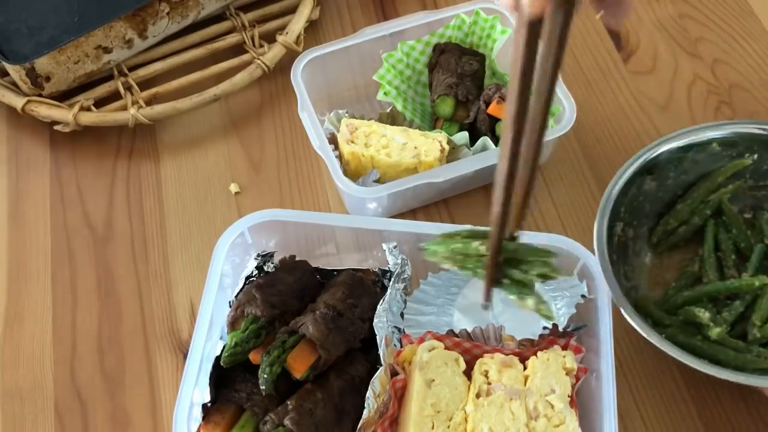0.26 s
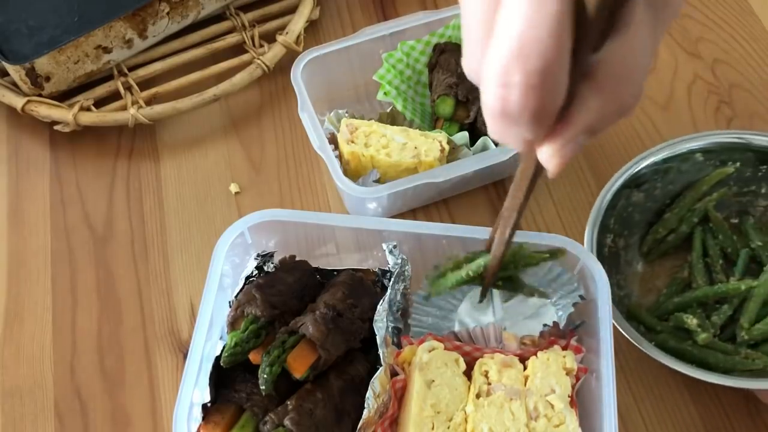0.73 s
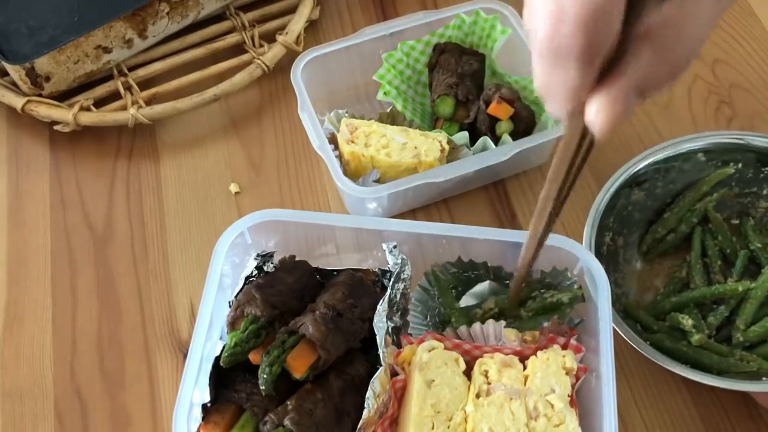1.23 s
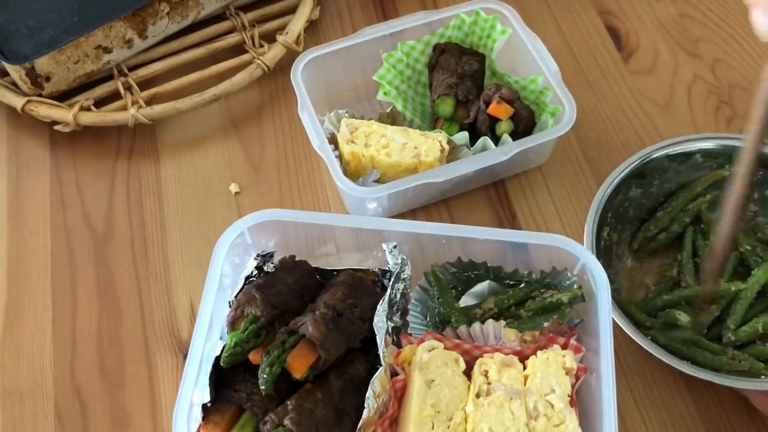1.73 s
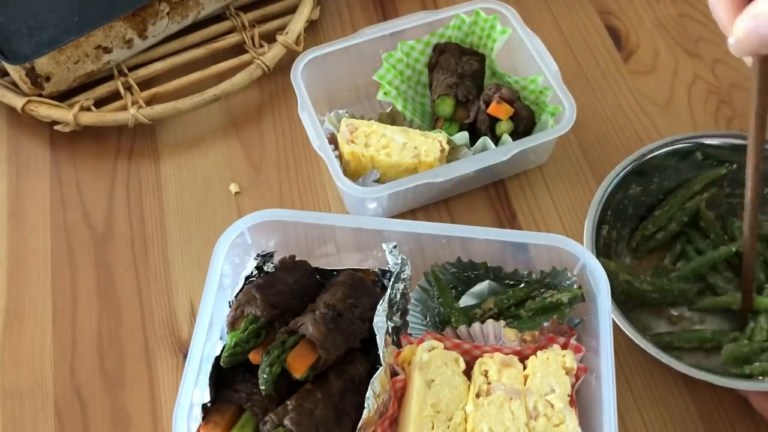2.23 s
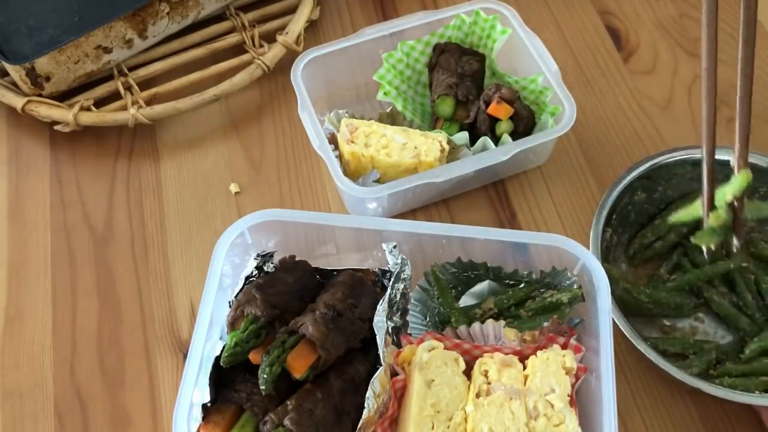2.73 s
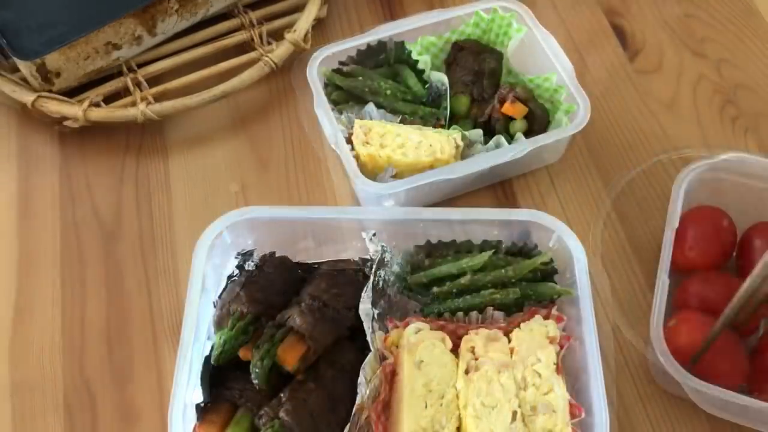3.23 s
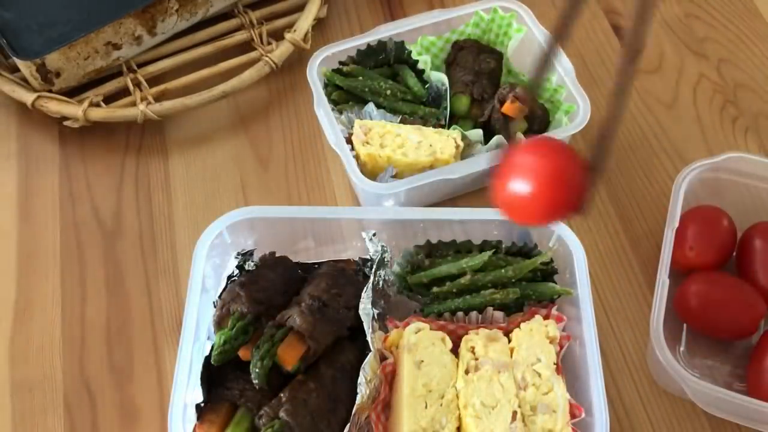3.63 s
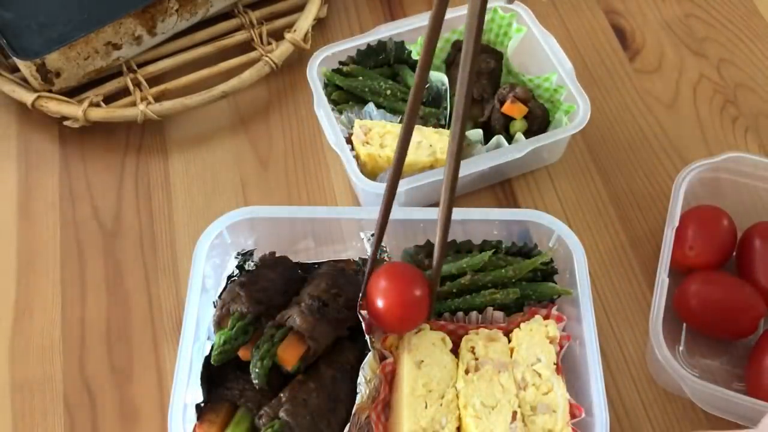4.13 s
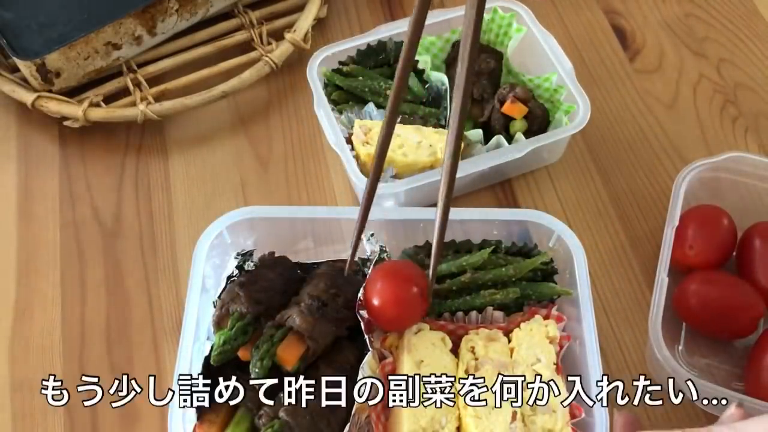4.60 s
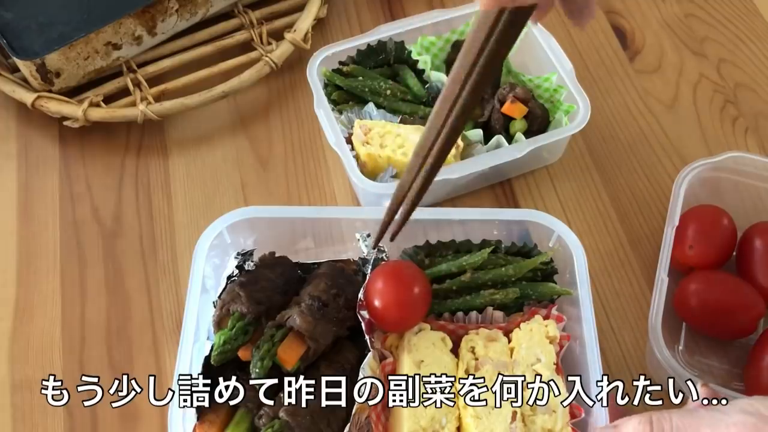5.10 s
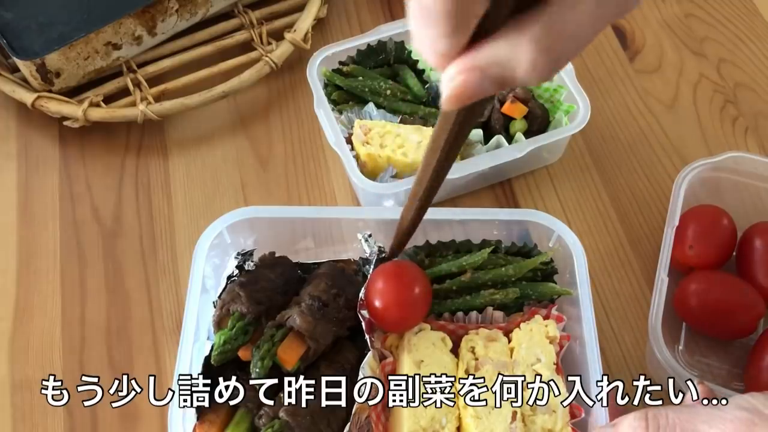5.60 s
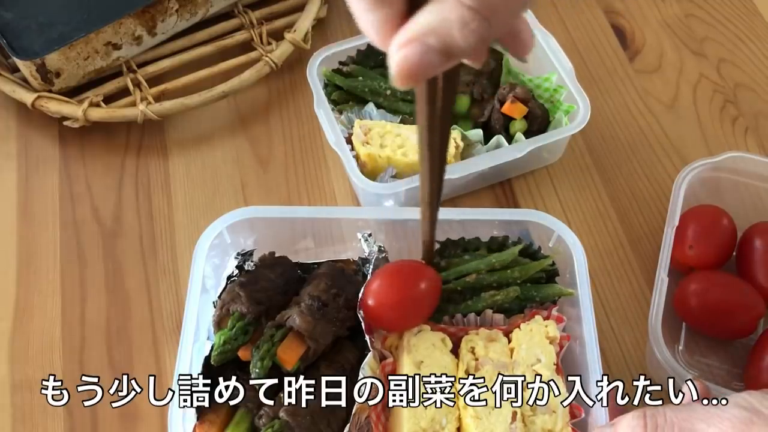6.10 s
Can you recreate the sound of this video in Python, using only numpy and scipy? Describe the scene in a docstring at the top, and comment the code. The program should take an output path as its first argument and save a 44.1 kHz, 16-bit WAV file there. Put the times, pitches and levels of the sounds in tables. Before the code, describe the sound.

Chopsticks pack food into plastic lunch boxes, with crinkling paper and foil and light taps on a bowl and box rim.

```python
"""A quiet kitchen: chopsticks pack food into plastic lunch boxes on a wooden table, a phone just above.
A pleated cup, a foil divider and a thin tub crackle as their creases snap, with fine rustle between.
Sticks tap bowl and box and drag along the box wall; blows that reach the table top thud.
A small room answers over air noise and appliance hum."""
import sys
import numpy as np
from scipy import signal
from scipy.fft import rfft, irfft
from scipy.io import wavfile
from scipy.ndimage import uniform_filter1d

SR = 44100
rng = np.random.default_rng(int(sys.argv[2]) if len(sys.argv) > 2 else 0)


def inscribe(sig):
    """Save sig as 16-bit PCM at rate SR to the path in sys.argv[1].

    A 1-D sig is mono; a 2-D sig holds one channel per row.
    Samples are clipped to [-1, 1] before scaling.
    """
    pcm = np.round(np.clip(np.atleast_2d(sig).T, -1, 1) * 32767)
    wavfile.write(sys.argv[1], SR, pcm.astype(np.int16))


N = 280035

# plastic box modes: pitch_hz, level_db, t60_s
BOX_MODES = [(396, -18, 0.042), (546, -12.5, 0.059), (710, -3.5, 0.012), (946, -24.5, 0.03),
             (1173, -2.5, 0.017), (1620, 1.5, 0.0061), (2280, 6, 0.0078), (2550, -0.5, 0.015),
             (3650, -5, 0.015), (4120, 5.5, 0.0077), (5030, 5, 0.0047), (5920, -1.5, 0.01)]


def pleated_cup():
    """The pleats snap in one loud cluster."""
    # snaps: peak_s, level_db, bright_db, t60_ms
    snaps = [(0.3731, -66, -0.5, 60), (0.3913, -67.5, -4, 66), (0.4651, -29, -16, 26), (0.4696, -38, 1, 40),
             (0.4978, -37, -7, 33), (0.5031, -29.5, 4.5, 17), (0.5158, -39.5, 7.5, 18),
             (0.5645, -43, -12, 16), (0.5715, -35.5, 2, 21), (0.5942, -18.5, 0, 24),
             (0.6312, -33.5, 5.5, 33), (0.648, -36.5, -2, 20), (0.6565, -37.5, 3, 52),
             (0.6669, -29.5, 1.5, 14), (0.6797, -33.5, -7.5, 24), (0.6915, -28, 0, 34),
             (0.7195, -30.5, -1, 30), (0.7332, -23, 8, 48), (0.7452, -17.5, -2.5, 36),
             (0.7864, -44, -5, 34), (0.7946, -17.5, -1, 41), (0.8086, -18.5, 4, 19), (0.819, -22.5, 5, 27),
             (0.8263, -20, 1, 41), (0.8382, -21, 9, 14), (0.872, -47.5, -5.5, 37), (0.9006, -35.5, 7, 50),
             (0.9348, -23, -2, 20), (0.9771, -28.5, 2.5, 18.6), (1.0892, -48.5, -6.5, 22),
             (1.102, -47, -2, 44), (1.1254, -33.5, -4, 27), (1.1392, -15.5, -4.5, 15),
             (1.1565, -42.5, 4.5, 90), (1.1716, -27, -4, 2.5), (1.2078, -36, 1, 18), (1.2309, -46.5, 0, 43),
             (1.243, -37, -16, 28), (1.3196, -64, -0.5, 18)]
    return creases(snaps, low_db=-12.5, build_ms=.7)


def foil_divider():
    """Short ticks of creasing foil, except at 4.9 s: a brief tick in the hiss of the stick drag."""
    # ticks: peak_s, level_db, bright_db, t60_ms
    ticks = [(3.9789, -55, -3, 45), (3.9857, -54, -1.5, 19), (4.0365, -65, 6, 9.5), (4.121, -38.5, -1, 15),
             (4.1685, -43, -1, 12), (4.1736, -42.5, 4, 6.5), (4.22, -43, -9, 6), (4.228, -48, 2, 9),
             (4.237, -38.5, 2, 7.9), (4.258, -45, -3, 8), (4.2954, -36, 1, 18), (4.3028, -40.5, 5, 47),
             (4.3131, -33.5, -0.5, 18), (4.3495, -44.5, -14, 18), (4.3713, -45.5, -14, 35),
             (4.381, -46, -2, 8), (4.4042, -49, -8, 6), (4.4279, -41.5, 8.5, 12.5), (4.4824, -50, -3, 36),
             (4.5036, -40.5, -7, 7.5), (4.5133, -49, -10, 42), (4.5495, -45.5, -26, 21),
             (4.5751, -49.5, -9, 7), (4.5986, -44, -13, 6), (4.8999, -42.5, -9, 8), (4.9788, -59, -1, 25),
             (5.0446, -52, 1, 37), (5.5785, -28, -26, 5.7), (5.5812, -31, 4, 7), (5.5874, -30.5, 3, 13),
             (5.5955, -38, 4, 36), (5.6332, -37, 8, 5), (5.6384, -25.5, -2.5, 13), (5.677, -43, 2, 4.6),
             (5.6813, -40.5, 16, 6), (5.6969, -50, -2, 22), (5.7172, -38.5, -1, 4.5), (5.722, -40, -13, 13),
             (5.7287, -33.5, -6, 32), (5.7532, -27, -4, 6.3), (5.7597, -32, 6, 17), (5.7661, -28, -10, 5),
             (5.776, -25.5, -1, 21), (5.7889, -36, 2, 6), (5.817, -38.5, 4, 13), (5.8273, -30.5, -5, 13),
             (5.8666, -48, -11, 43), (5.8957, -30, 3, 21), (5.9087, -39, -12, 11),
             (5.919, -45.5, 14.5, 5.4), (5.951, -45, -5, 8), (5.958, -38, 1, 26), (5.9802, -32, 7.5, 9),
             (5.9992, -28.5, -2, 11), (6.0294, -33, -12, 9.5), (6.0379, -40, -4, 14),
             (6.0475, -31.5, 0, 8.8), (6.0824, -35.5, 4.5, 4.1), (6.115, -37, -16, 6.4),
             (6.1315, -28.5, 3.5, 17), (6.144, -40, 8, 6), (6.1701, -33.5, 4.5, 7.1), (6.1807, -38, 9, 4.6),
             (6.1901, -42, 15, 7), (6.2044, -36.5, 4, 4.5), (6.2082, -36, -3, 7.2), (6.2167, -36, 0, 11),
             (6.2453, -32.5, 10, 4.2), (6.2983, -36.5, -2, 5.5), (6.3069, -45, 9.5, 6),
             (6.329, -43.5, -2, 5.5)]
    return creases(ticks, low_db=-11, build_ms=.3)


def thin_tub():
    """The tub wall gives a few faint snaps."""
    # snaps: peak_s, level_db, bright_db, t60_ms
    snaps = [(3.2905, -60, -3.5, 64), (3.3858, -54.5, 1.5, 42), (3.4039, -52, 2, 21),
             (3.4135, -50.5, 0, 32), (3.428, -45.5, 3, 10), (3.4529, -57, 7, 13), (3.475, -50.5, -1, 6.2),
             (3.529, -41.5, -21, 8)]
    return creases(snaps, low_db=-17.5, build_ms=1)


def creases(rows, low_db, build_ms):
    """Each snap builds, clicks and briefly shakes the sheet; a faint shiver lingers."""
    drive, noise, lead_s = np.zeros((3, N)), sheet_noise(), .03
    ms = 1000 * (np.arange(SR // 5) / SR - lead_s)
    before_ms, after_ms = np.minimum(ms, 0), np.maximum(ms, 0)
    click = .2 * np.exp(-np.abs(ms) / .083)
    shiver = undb(-31.5) * 1000. ** (-after_ms / 100)
    draws = zip(rows, rng.random((len(rows), 2)), rng.standard_normal((len(rows), 2)))
    for (peak_s, db, bright_db, t60_ms), (place, wall), (low_scatter, build_scatter) in draws:
        # hard, bright snaps come from small panels; harder snaps gather longer
        snap_low_db = low_db - .19 * (db + 42) - .25 * bright_db + 5.5 * low_scatter
        rise_ms = max(build_ms * undb(.19 * (db + 38)) * np.exp(.4 * build_scatter), .1)
        fall = 1000. ** (-after_ms / max(t60_ms, 2)) + shiver
        envelope = np.exp(before_ms / rise_ms) * fall + click
        offset = int(place * (N - len(ms)))
        wall_lag = int(SR * (.0001 + .00039 * wall))
        gains = undb(db + np.array([snap_low_db, 0, bright_db]))
        for panel, shake, gain in zip(drive, noise, gains):
            burst = envelope * shake[offset:offset + len(ms)]
            burst = burst + .35 * np.roll(burst, wall_lag)  # echo off the nearest box wall
            burst *= np.sqrt(np.sum(envelope ** 2) / np.sum(burst ** 2))  # the fold sets the energy
            add(panel, peak_s - lead_s, gain * burst)
    return panels(*drive)


def panels(low, mid, bright):
    """Dense sheet modes: a band per panel size. Under 1 kHz only the shaken box radiates."""
    box = undb(-2.5) * band(low, 450, 1400, order=1)
    return box + band(low, 1054, 2400) + band(mid, 2825, 9000) + band(bright, 7900, 17000)


def sheet_noise():
    """Noise for each panel size, rms 1."""
    drives = (np.outer(size, rng.standard_normal(N)) for size in np.eye(3))
    return np.array([level(panels(*drive), 0) for drive in drives])


def rustle(rate_hz=1600, grain_s=.002):
    """A dense patter of tiny, uneven snaps."""
    # one row per handling: low_db, bright_db, [(time_s, level_db)]
    handlings = [(-10.5, -5, [(0, -71), (.1, -96), (.2, -77), (.3, -89)]), (-6.5, -3, [(.456, -44),
                 (.48, -41), (.55, -52), (.62, -63), (.7, -54), (.82, -52), (.87, -60), (1., -61),
                 (1.06, -70), (1.15, -52.5), (1.32, -86)]), (-3, 1, [(1.75, -63), (1.8, -72), (1.91, -59),
                 (1.94, -74), (2.02, -64.5), (2.12, -67.5), (2.2, -84), (2.8, -87)]),
                 (-4.5, -3, [(3.27, -81), (3.4, -73), (3.58, -79)]), (4.5, -9, [(3.97, -73), (4., -66.5),
                 (4.05, -81)]), (-5.5, -9, [(4.06, -71), (4.11, -46.5), (4.128, -55), (4.14, -83),
                 (4.19, -59), (4.31, -63.5), (4.45, -72.5), (4.52, -65), (4.62, -66)]),
                 (-10, 1, [(4.82, -66), (4.9, -67), (4.95, -70)]), (-6.5, -1, [(5.45, -66.5), (5.55, -67.5),
                 (5.59, -42), (5.62, -36), (5.645, -56), (5.71, -57)]), (0.5, -5, [(5.71, -58),
                 (5.74, -49.5), (5.775, -42), (5.82, -65), (5.9, -49), (5.94, -68)]),
                 (-12, -5, [(5.94, -55), (6.05, -65), (6.1, -59), (6.18, -55.5), (6.26, -68), (6.35, -83)])]
    snaps = impulses(rate_hz, spread_db=2.1)
    grain = level(signal.lfilter([1], [1, -np.exp(-1 / (grain_s * SR))], snaps), 0)
    gains = np.zeros((3, N))
    for low_db, bright_db, contour in handlings:
        gate, (db,) = curve(contour)
        gains += gate * undb([db + low_db, db, db + bright_db])
    return panels(*(gains * grain * sheet_noise()))


def bowl_taps():
    """Sticks strike the bowl's hard rim."""
    # taps: start_s, level_db, crack_db, dull_db_per_octave
    hits = [(1.7423, -27.5, -8, 2.5), (1.866, -30.5, -18, -1.5), (1.88, -38, 14, 8), (1.9839, -32, -18, 6),
            (2.1921, -34.5, -18, 9), (2.9185, -55, -19, 3)]
    # bowl modes: pitch_hz, level_db, t60_s
    modes = [(900, -4.5, 0.02), (1387, 1, 0.014), (2217, 6.5, 0.0088), (2520, -0.5, 0.016),
             (3800, -1.5, 0.021), (4350, -5, 0.012), (5260, -3.5, 0.028), (6310, -23, 0.0065),
             (2240, -24, 0.23), (9260, -5, 0.062), (11400, -17.5, .1)]
    return taps(hits, modes)


def box_taps():
    """Sticks strike the plastic box rim."""
    # taps: start_s, level_db, crack_db, dull_db_per_octave
    hits = [(4.7541, -23.5, -32, 1.9), (4.788, -23, -30, 4.1), (5.025, -35, -11.5, 9.2),
            (5.1581, -13.5, -16, 0.83), (5.4445, -34.5, -3, 0.62), (5.478, -40.5, -21, 4.3)]
    return taps(hits, BOX_MODES)


def taps(hits, modes):
    """A stick rings the rim's modes under a short crack."""
    out, t = np.zeros(N), np.arange(SR // 50) / SR
    for start_s, db, crack_db, dull in hits:
        rim = ring(modes, scatter_db=.23, rise_1khz_s=.00014, dull_db_per_octave=dull)
        crack = rng.standard_normal(len(t)) * np.exp(-t / .001)
        add(out, start_s, undb(db) * band(rim, 330, 12000))
        add(out, start_s, undb(db + crack_db) * band(crack, 3000, 14000))
    return out


def stick_drag():
    """Dense slips along the wall feed the box modes and hiss."""
    # drag loudness: time_s, level_db
    contour = [(4.79, -57), (4.812, -58), (4.872, -42.5), (4.956, -78), (5.018, -61), (5.024, -71),
               (5.07, -93)]
    gate, (db,) = curve(contour)
    slips = impulses(rate_hz=6000, spread_db=1.8) * rng.standard_normal(N)
    box = ring(BOX_MODES, scatter_db=0, rise_1khz_s=.0014)
    body = level(signal.fftconvolve(slips, box)[:N], 0)
    hiss = level(band(slips, 390, 2700), .65)
    return gate * undb(db) * level(body + hiss, 0)


def table_thuds():
    """A softer contact pushes longer and rings only the lower modes; loose dishes chatter along."""
    # blows: start_s, level_db, contact_s
    blows = [(0.539, -22, 0.001), (1.744, -25.5, 0.0028), (1.867, -30, 0.0012), (1.877, -27.5, 0.001),
             (1.983, -41.5, 0.0013), (2.192, -41.5, 0.0014), (3.523, -47, 0.0022), (4.309, -48, 0.001)]
    # table top modes: pitch_hz, level_db, t60_s
    modes = [(200, -17, .12), (259.4, -13.5, 0.17), (337, -14, 0.033), (433, -10, 0.11),
             (457.6, -13.5, 0.11), (514, -9.5, .1), (602, -6, 0.091), (650, -8, 0.069), (662, -2, 0.14),
             (743, -4, 0.087), (819.4, -3.5, 0.1), (926, -1.5, 0.028), (1035.4, -6, 0.0637),
             (1123, -15, 0.17), (1270, -17.5, .04)]
    out, t = np.zeros(N), np.arange(SR // 5) / SR
    envelope = (1 - np.exp(-t / .007)) * 1000. ** (-t / .071)
    for start_s, db, contact_s in blows:
        push = np.hanning(int(contact_s * SR) + 2)
        chatter = undb(6) * band(rng.standard_normal(len(t)) * envelope, 140, 1200)
        wood = ring(modes, scatter_db=.93, rise_1khz_s=.00089)
        for part in wood, chatter:
            add(out, start_s, undb(db) * np.convolve(part, push / push.sum()))
    return out


def room(x, wet_db=-14):
    """Dense echoes set in after 4 ms and die faster in the treble."""
    # echoes: band_hz, level_db, t60_s
    echoes = [(296, 7.5, 0.4), (790, 3, 0.49), (2330, 1, 0.3), (5000, -4, 0.32), (12140, 1, 0.12)]
    t = np.arange(SR // 2) / SR
    tail = sum(undb(db) * band(rng.standard_normal(len(t)), hz / 2.7, hz * 1.6) * 1000. ** (-t / t60_s)
               for hz, db, t60_s in echoes)
    tail *= np.clip((t - .004) / .0053, 0, 1)
    tail /= np.sqrt(np.sum(tail ** 2))
    return undb(wet_db) * signal.fftconvolve(x, tail)[:N]


def kitchen_air(base_db=-63):
    """Air noise in octave bands that flicker independently; those above the bass swell and fade."""
    # air spectrum: freq_hz, density_db
    spectrum = [(24, -34.5), (40, 1), (171, -9), (276, -4), (402, -13.5), (433, -4.5), (467, -19.5),
                (529, -7), (570, -14), (852, -15), (2000, -24), (3470, -32.5), (16000, -43.5)]
    # swells: time_s, mid_db, treble_db
    swells = [(0, 8.5, 6), (.2, 0, 2), (2.2, 3.5, 7), (2.7, 0, 2), (3.2, -5, 2), (3.8, -1.5, 5),
              (4.7, -1.5, 3), (6.35, -0.5, 7)]
    _, (mid_db, treble_db) = curve(swells)
    hz, db = np.transpose(spectrum)
    bin_hz = np.fft.rfftfreq(N, 1 / SR) + 1
    noise = rfft(rng.standard_normal(N)) * undb(np.interp(np.log(bin_hz), np.log(hz), db))
    noise *= undb(base_db) / np.std(irfft(noise, N))
    out = np.zeros(N)
    for centre_hz in 30 * 2 ** np.arange(10):
        share = np.clip(1 - np.abs(np.log2(bin_hz / centre_hz)), 0, 1)
        above_bass = np.clip(np.log2(centre_hz / 200), 0, 1)
        swell_db = above_bass * (mid_db if centre_hz < 2500 else treble_db)
        out += undb(swell_db + 1.2 * walk(rate_hz=3)) * irfft(noise * share, N)
    return out


def appliance_hum():
    """Narrow noise bands sound as a wavering hum and whine."""
    # tones: pitch_hz, width_hz, level_db
    tones = [(141.8, 12, -66.5), (2364, 30, -87.5), (3490, 33, -85), (4670, 60, -91.5), (4900, 60, -86)]
    return sum(level(band(rng.standard_normal(N), hz - width_hz / 2, hz + width_hz / 2, order=1), db)
               for hz, width_hz, db in tones)


def ring(modes, scatter_db, rise_1khz_s, dull_db_per_octave=0):
    """One blow, each mode struck a little differently; low modes build more slowly. Peak 1."""
    t = np.arange(SR // 3) / SR
    out = np.zeros(len(t))
    for hz, db, t60_s in modes:
        strength, detune, phase = rng.standard_normal(3)
        gain = undb(db + scatter_db * strength - dull_db_per_octave * np.log2(max(hz / 1000, 1)))
        rise = 1 - np.exp(-t * hz / (1000 * rise_1khz_s))
        tone = np.sin(2 * np.pi * (hz * (1 + .024 * detune) * t + .15 * phase))
        out += gain * rise * tone * 1000. ** (-t / t60_s)
    return out / np.abs(out).max()


def impulses(rate_hz, spread_db):
    return (rng.random(N) < rate_hz / SR) * undb(spread_db * rng.exponential(size=N))


def walk(rate_hz):
    """Slewed random steps, spread near 1."""
    hold = int(SR / rate_hz)
    steps = np.repeat(rng.standard_normal(N // hold + 1), hold)
    return 1.2 * uniform_filter1d(steps, hold)[:N]


def curve(rows):
    """A gate over a table's time span, and its columns at every sample."""
    time_s, *columns = np.transpose(rows)
    t = np.arange(N) / SR
    gate = np.clip(np.minimum(t - time_s[0] + .0013, time_s[-1] - t) / .0041, 0, 1)
    return gate, [np.interp(t, time_s, column) for column in columns]


def undb(db):
    return 10 ** (np.asarray(db) / 20)


def level(x, rms_db):
    return x * undb(rms_db) / np.sqrt(np.mean(x ** 2))


def band(x, lo_hz, hi_hz, order=2):
    sos = signal.butter(order, [lo_hz, min(hi_hz, .45 * SR)], "band", fs=SR, output="sos")
    return signal.sosfilt(sos, x)


def add(out, start_s, sound):
    i = max(int(start_s * SR), 0)
    out[i:i + len(sound)] += sound[:N - i]


def scene():
    crackle = pleated_cup() + foil_divider() + thin_tub() + rustle()
    packing = crackle + bowl_taps() + box_taps() + stick_drag() + table_thuds()
    return (packing + room(packing) + kitchen_air() + appliance_hum())[None]


def record(dry):
    """The phone drops the deepest bass and cuts the top."""
    low_hz, top_hz = 47, 16000
    lean = signal.sosfilt(signal.butter(6, low_hz, "high", fs=SR, output="sos"), dry)
    return signal.sosfilt(signal.ellip(8, .3, 60, top_hz, fs=SR, output="sos"), lean)


dry = scene()
out = record(dry)
inscribe(out)
```